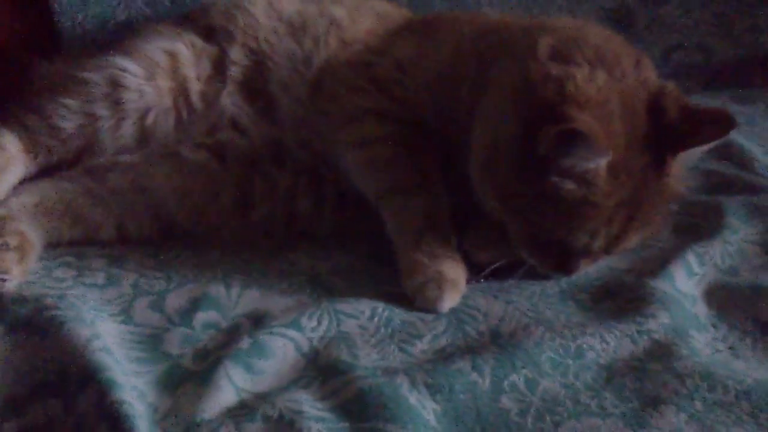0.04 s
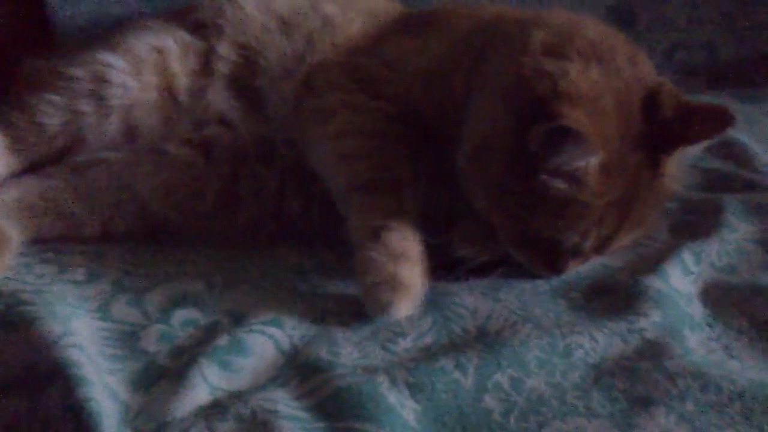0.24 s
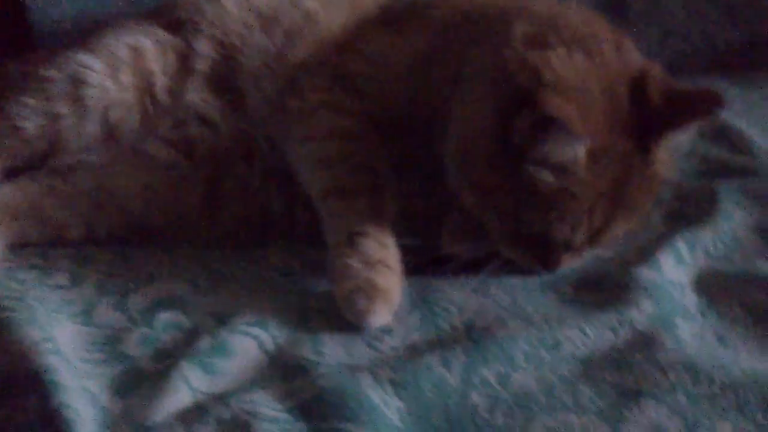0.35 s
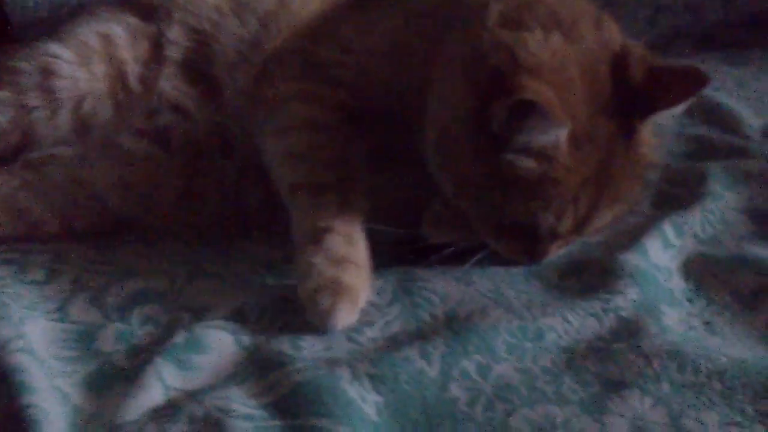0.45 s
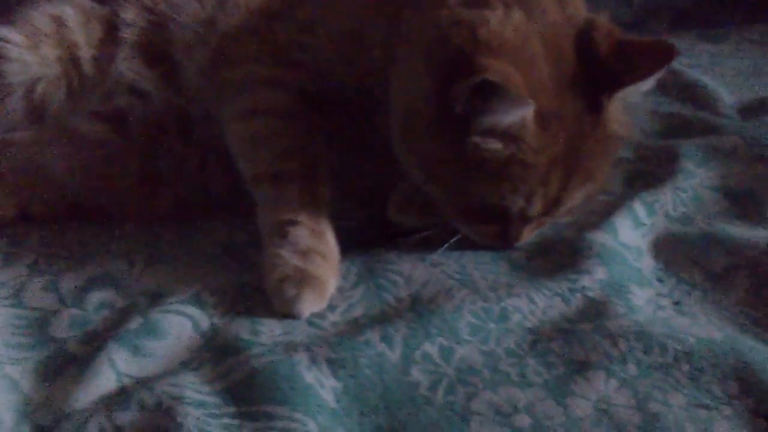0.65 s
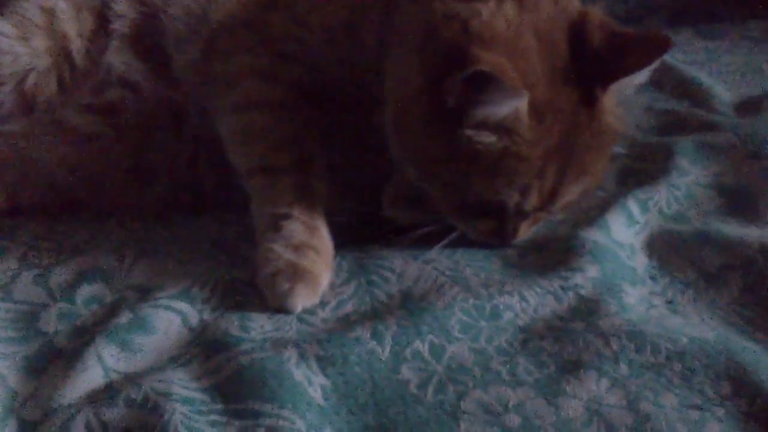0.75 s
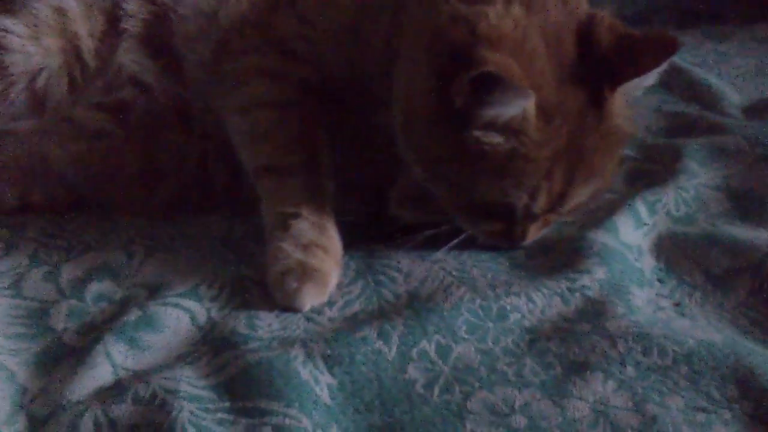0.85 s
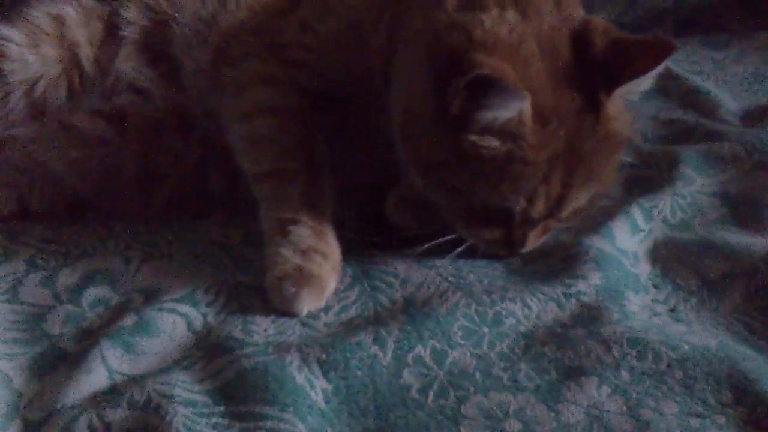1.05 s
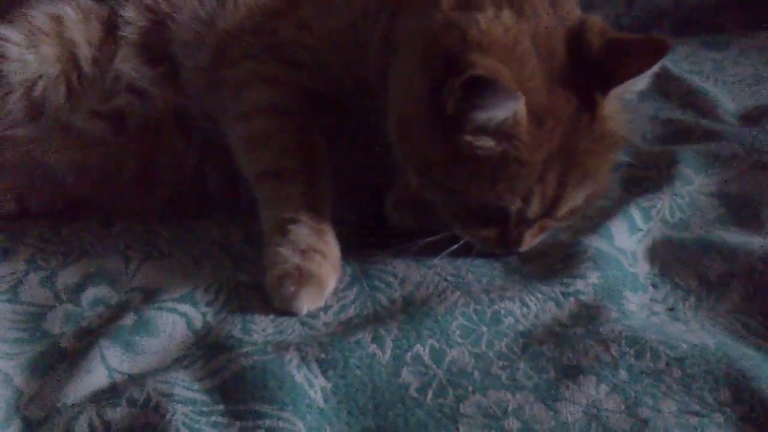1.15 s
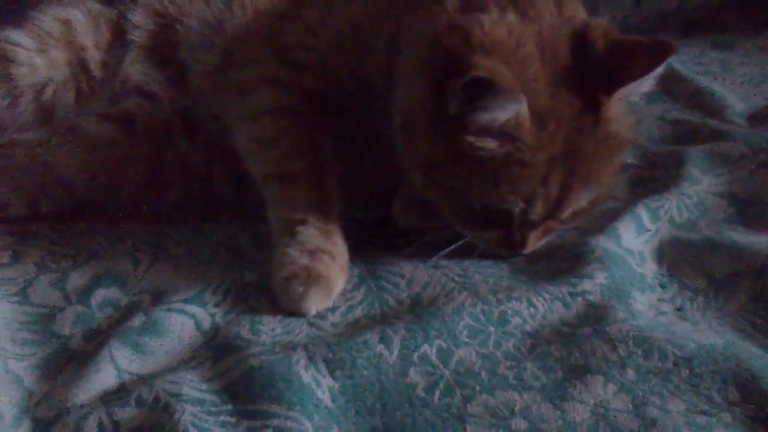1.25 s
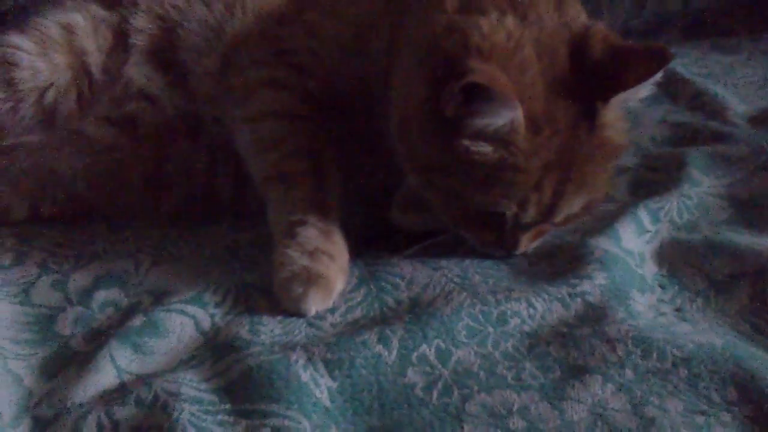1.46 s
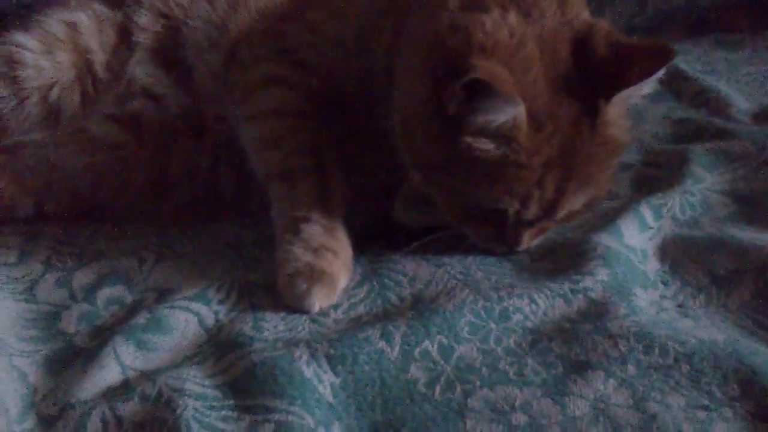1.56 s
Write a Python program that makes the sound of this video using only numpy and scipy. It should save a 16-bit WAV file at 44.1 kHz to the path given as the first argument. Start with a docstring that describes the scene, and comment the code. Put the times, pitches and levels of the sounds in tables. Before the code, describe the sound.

A dull, low thump from handling a camera in a quiet room.

```python
"""A dull handling thump on a hand-held camera, heard from its own stereo microphones in a quiet room.
The grip rubs softly, then the hand knocks the camera into a few low modes and drags on the casing,
which gives with tiny ticks. A faint finger pat follows, to the right. The handling is right at the
microphones; underneath lie room rumble, air, a faint hum and microphone hiss."""
import sys
import numpy as np
from scipy.fft import rfft, irfft, next_fast_len
from scipy.io import wavfile

SR = 44100
rng = np.random.default_rng(int(sys.argv[2]) if len(sys.argv) > 2 else 0)


def transcribe(signal):
    """Save signal, clipped to [-1, 1], as a 16-bit WAV file at the path in sys.argv[1]."""
    frames = np.atleast_2d(signal).T
    limited = np.clip(frames, -1, 1)
    pcm = np.round(limited * 32767).astype(np.int16)
    wavfile.write(sys.argv[1], SR, pcm)


N = 70560

# Spectra of the room's rumble and air: freq_hz, gain_db
RUMBLE_SPECTRUM = [(8, -3.5), (20, 5), (40, -4), (52, -0.5), (68, 3.5), (90, -10), (112, -7), (150, -22),
                   (300, -41)]
AIR_SPECTRUM = [(130, 3), (280, 0), (420, -7), (800, -12), (1400, -15.5), (3000, -28.5), (6000, -37),
                (15000, -72)]
# Where the air sits between the microphones: freq_hz, left_minus_right_db
AIR_BALANCE = [(100, 1.5), (350, -6), (1000, -0.5), (3000, 11)]
# How alike the air is at the two microphones: freq_hz, correlation
AIR_CORRELATION = [(100, 0.38), (300, 0.38), (1000, 0.62), (4000, 0.17)]
# Tones of the room's hum: pitch_hz, rms_db
HUM_TONES = [(442, -90), (825, -98), (2114, -100)]
# Spectra of the microphone hiss and of a soft band near 2 kHz: freq_hz, gain_db
HISS_SPECTRUM = [(100, 10), (1000, 2.5), (2500, -1), (3500, 1.5), (5500, 0), (7500, -7.5), (9500, -14),
                 (12000, -2), (15500, -2.5)]
SHEEN_SPECTRUM = [(800, -27), (1600, -5), (2100, 3.5), (2450, 0.5), (3100, -8.5), (6000, -24), (12000, -57)]
# Swell of that band: time_s, gain_db
SHEEN_SWELL = [(0, -0.5), (.19, 3.5), (.4, -4), (.53, -6), (.66, -1), (.78, 3), (.93, -0.5), (1.02, 1),
               (1.16, -5), (1.32, 2), (1.46, -3), (1.58, 2.5)]
# Balance of the hiss and of the rubbing grip: freq_hz, left_minus_right_db
HISS_BALANCE = [(1000, -5.5), (5000, -0.5), (9000, -6), (14000, 1.5)]
RUB_BALANCE = [(300, 2), (2500, 1), (5000, 7.5), (9000, 7), (14000, 8.5)]
# Loudness of the rubbing: time_s, level_db
RUB_LEVELS = [(0, -61.5), (.12, -61.5), (.21, -58), (.23, -58), (.25, -68.5), (.27, -64.5), (.31, -64),
              (.36, -64), (.42, -68), (.55, -71)]
# Spectra of the rubbing grip, dragging hand and scuffing fingers: freq_hz, gain_db
RUB_SPECTRUM = [(100, -27.5), (330, -1), (600, -3.5), (1100, -8), (2200, -7.5), (3700, -15), (8000, -13.5),
                (15500, -13.5)]
DRAG_SPECTRUM = [(40, -18.5), (80, 0), (98, -1), (120, -13.5), (170, -28.5), (400, -99), (1000, -120)]
SCUFF_SPECTRUM = [(200, -16), (700, -19), (1300, 13), (2400, 5), (3300, -34), (15000, -33)]
# Knocks of the hand and ticks of the casing: start_s, level_db
HAND_KNOCKS = [(0.222, -34.5), (0.248, -33), (0.2677, -34), (.322, -51.5), (.402, -58.5), (0.446, -57),
               (0.568, -65)]
CASING_TICKS = [(.3206, -50), (0.3231, -59), (0.3511, -56), (0.3556, -53)]
# Modes of the held camera and of its casing: pitch_hz, gain_db, t60_s
THUMP_MODES = [(18.9, -4.5, 0.48), (34.62, -4.5, 0.99), (68.33, 0.5, 0.39), (74.56, 3.5, 0.38),
               (103, 2.5, 0.09)]
TICK_MODES = [(1000, -8.5, 0.004), (1420, -1.5, 0.0073), (1870, -3, 0.015), (2300, -7, 0.011)]
# Brief treble dips during the thump, left then right: start_s, end_s, gain_db
TREBLE_DIPS = [(0.229, 0.262, -10.5), (0.2245, 0.298, -27)]


def amp(db):
    """Decibels to gain."""
    return 10 ** (np.asarray(db) / 20)


def since(start_s):
    """Seconds since start_s, zero before it."""
    return np.maximum(np.arange(N) / SR - start_s, 0)


def envelope(points):
    """Gain per sample from (time_s, level_db) points."""
    return amp(np.interp(since(0), *np.transpose(points)))


def pan(left_minus_right_db):
    """Left and right gains for a level difference."""
    return amp(np.array([[.5], [-.5]]) * left_minus_right_db)


def curve(points, hz):
    """Read (freq_hz, value) points on a log axis; a plain number holds at every frequency."""
    if np.ndim(points) == 0:
        return points
    freqs, values = np.transpose(points)
    return np.interp(np.log(hz + 1), np.log(freqs + 1), values)


def filtered(x, response):
    """Filter x by a gain given as a function of frequency."""
    size = next_fast_len(N + SR // 2)
    return irfft(rfft(x, size) * response(np.fft.rfftfreq(size, 1 / SR)), size)[..., :N]


def noise(spectrum, correlation, balance_db):
    """Stereo noise of rms 1, mixed from independent mid and side."""
    size = next_fast_len(N + 8192)
    hz = np.fft.rfftfreq(size, 1 / SR)
    width = np.arccos(curve(correlation, hz)) / 2
    mid, side = rfft(rng.standard_normal((2, size))) * amp(curve(spectrum, hz))
    mid, side = mid * np.cos(width), side * np.sin(width)
    channels = np.array([mid + side, mid - side]) * pan(curve(balance_db, hz))
    stereo = irfft(channels, size)[:, :N]
    return stereo / np.sqrt(np.mean(stereo ** 2))


def room_tone():
    """Steady rumble, air and a faint hum around the microphones."""
    rumble = amp(-63.5) * noise(RUMBLE_SPECTRUM, correlation=0.92, balance_db=-9.5)
    air = amp(-69) * noise(AIR_SPECTRUM, AIR_CORRELATION, AIR_BALANCE)
    hum = sum(amp(db) * np.sqrt(2) * np.sin(2 * np.pi * (hz * since(0) + rng.random()))
              for hz, db in HUM_TONES)
    return rumble + air + hum


def microphone_hiss():
    """Each microphone adds its own steady noise."""
    return amp(-68.5) * noise(HISS_SPECTRUM, correlation=0.0053, balance_db=HISS_BALANCE)


def sheen():
    """A soft band of hiss near 2 kHz swells and sinks in the centre."""
    return amp(-75) * envelope(SHEEN_SWELL) * noise(SHEEN_SPECTRUM, correlation=1, balance_db=0.29)


def grip_rub():
    """The grip slides beside the microphones while the camera moves, then settles."""
    return envelope(RUB_LEVELS) * noise(RUB_SPECTRUM, correlation=0.32, balance_db=RUB_BALANCE)


def handling_thump(rise_s=0.0038, low_cut_hz=8, high_cut_hz=120.6):
    """Soft knocks set the camera and the hand swinging in a few low modes."""
    swing = np.zeros(N)
    for start_s, level_db in HAND_KNOCKS:
        t = since(start_s)
        attack = 1 - np.exp(-t / rise_s)
        for hz, gain_db, t60_s in THUMP_MODES:
            swing += attack * amp(level_db + gain_db - 60 * t / t60_s) * np.sin(2 * np.pi * hz * t)
    microphone_rolloff = lambda hz: 1j * hz / (1j * hz + low_cut_hz)
    hand_damping = lambda hz: 1 / np.sqrt(1 + (hz / high_cut_hz) ** 8)
    return filtered(swing, lambda hz: microphone_rolloff(hz) * hand_damping(hz))


def hand_drag(peak_s=0.32, half_width_s=0.068):
    """The hand drags on the casing after the thump: a rough low rumble that swells and dies."""
    swell = np.exp(-((since(0) - peak_s) / half_width_s) ** 2)
    return amp(-51.5) * swell * noise(DRAG_SPECTRUM, correlation=0.98, balance_db=0)


def casing_ticks(scuff_gain_db=-14.5, scuff_fade_s=0.0062):
    """The casing gives under the fingers: each tiny crack rings its damped modes, over a soft scuff."""
    ring, scuff = np.zeros(N), np.zeros(N)
    for start_s, level_db in CASING_TICKS:
        t = since(start_s)
        for hz, gain_db, t60_s in TICK_MODES:
            ring += amp(level_db + gain_db - 60 * t / t60_s) * np.sin(2 * np.pi * hz * t)
        scuff += amp(level_db + scuff_gain_db) * np.exp(-np.abs(since(0) - start_s) / scuff_fade_s)
    return ring + scuff * noise(SCUFF_SPECTRUM, correlation=0.68, balance_db=1.1)


def finger_pat(start_s=0.939, rise_s=0.00098):
    """A finger lands lightly: one small low push with no ring."""
    age = since(start_s) / rise_s
    return amp(-49.5) * age * np.exp(1 - age)


def scene():
    """Close handling over the quiet room, with the low sounds leaning right."""
    background = room_tone() + microphone_hiss() + sheen()
    handling = grip_rub() + pan(-3.5) * (handling_thump() + hand_drag()) + casing_ticks()
    return background + handling + pan(-14.5) * finger_pat()


def record(dry):
    """The treble dips briefly during the thump, the left lags, the very top is cut."""
    crossover_hz, ramp_s = 2760, 0.01
    left_lag_s, band_limit_hz = 0.00007, 15750
    treble = filtered(dry, lambda hz: 1 - 1 / (1 + (hz / crossover_hz) ** 8))
    ramp = lambda centre_s: np.minimum(since(centre_s - ramp_s / 2) / ramp_s, 1)
    treble_gain = np.array([amp(db * (ramp(start) - ramp(end))) for start, end, db in TREBLE_DIPS])
    dipped = dry + (treble_gain - 1) * treble
    delay_s = np.array([[.5], [-.5]]) * left_lag_s  # sound reaches the left microphone later
    return filtered(dipped, lambda hz: (hz < band_limit_hz) * np.exp(-2j * np.pi * hz * delay_s))


dry = scene()
out = record(dry)
transcribe(out)
```